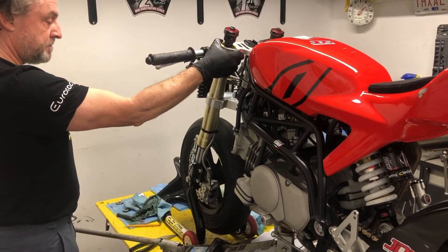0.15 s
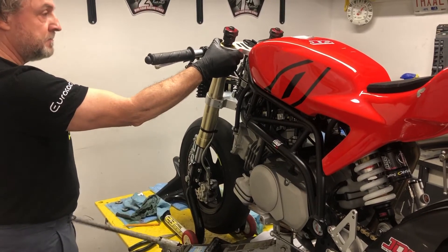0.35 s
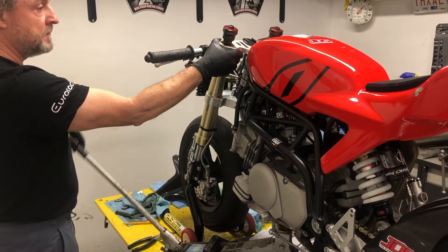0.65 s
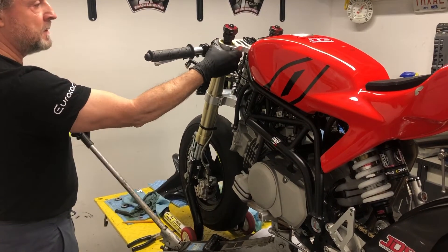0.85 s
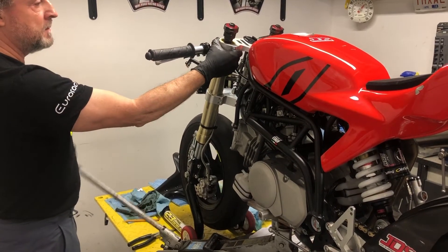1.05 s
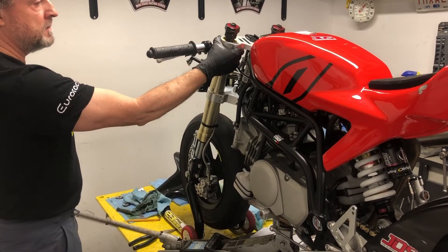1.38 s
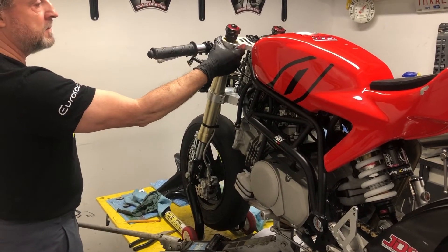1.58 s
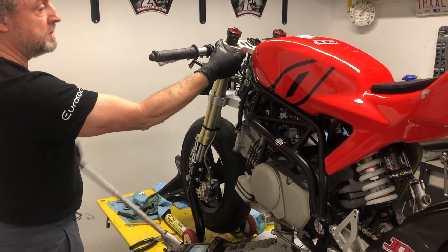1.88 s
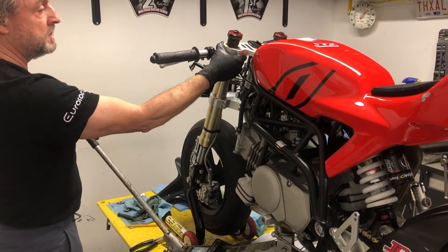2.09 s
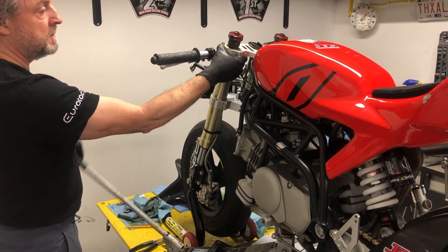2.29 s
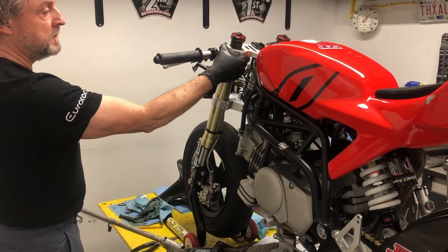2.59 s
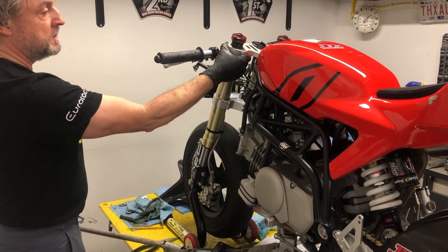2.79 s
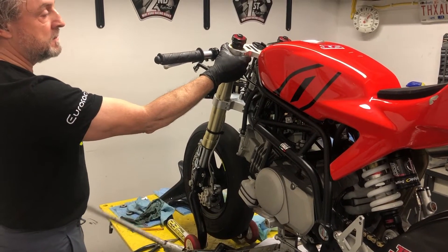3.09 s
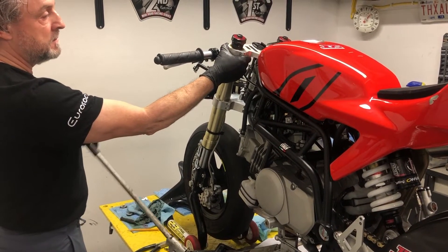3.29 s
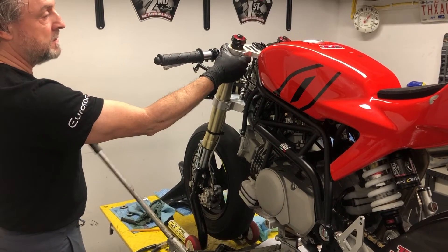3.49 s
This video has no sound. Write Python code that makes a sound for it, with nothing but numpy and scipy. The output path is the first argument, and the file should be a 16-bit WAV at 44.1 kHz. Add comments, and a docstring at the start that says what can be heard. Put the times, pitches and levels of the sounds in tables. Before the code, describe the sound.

Pumping a floor jack: a rattly double knock first, then separate clunks, dull load thuds and brief steel clanks, with faint oil hiss beneath, picked up by one microphone in a small live room.

```python
"""Pumping a trolley jack

A hydraulic trolley jack is pumped under a motorcycle in a small, hard-walled workshop.
The long steel handle knocks in its loose socket and the linkage clunks: coloured clicks with a chatter.
Hard contacts ring as struck modes; pump swishes and the load's shuffle are fine random slips.
A faint noise hiss runs throughout, its thin whistle fading out just before one second."""
import sys
import numpy as np
from scipy import signal
from scipy.fft import rfft, irfft
from scipy.io import wavfile
from scipy.ndimage import uniform_filter1d

SR = 44100
rng = np.random.default_rng(int(sys.argv[2]) if len(sys.argv) > 2 else 0)


def log_audio(samples):
    """Write samples as a 16-bit WAV file to the path given in sys.argv[1]."""
    # one column per channel
    frames = np.atleast_2d(samples).T
    # limit to full scale, then quantise
    limited = np.clip(frames, -1, 1)
    pcm = np.round(limited * 32767).astype(np.int16)
    wavfile.write(sys.argv[1], SR, pcm)


N = 160965


def from_db(db):
    """Decibels to linear gain."""
    return 10 ** (np.asarray(db) / 20)


def rms_one(x):
    """Scales a steady sound to rms 1."""
    return x / np.sqrt(np.mean(x ** 2) + 1e-20)


def unit_energy(x):
    """Scales a short sound to a summed square of 1."""
    return x / np.sqrt(np.sum(x ** 2) + 1e-20)


def in_time(rows):
    """Draws straight lines through (t/s, value) points over the whole scene."""
    return np.interp(np.arange(N) / SR, *np.transpose(rows))


def at_hz(points, hz):
    """Reads (f/Hz, value) points on a logarithmic frequency axis."""
    f, value = np.transpose(points)
    return np.interp(np.log(np.maximum(hz, 1)), np.log(f), value)


def add(out, s, sound):
    """Mixes a sound in at a time in seconds."""
    i = max(int(s * SR), 0)
    out[i:i + len(sound)] += sound[:N - i]


def colour(x, points, size=2048):
    """Causal (minimum-phase) equaliser through (f/Hz, level/dB) points."""
    gain = from_db(at_hz(points, np.fft.rfftfreq(size, 1 / SR)))
    cepstrum = irfft(np.log(gain))
    # folding the cepstrum forward makes the filter minimum-phase
    cepstrum[1:size // 2] *= 2
    cepstrum[size // 2 + 1:] = 0
    impulse = irfft(np.exp(rfft(cepstrum)))
    return signal.fftconvolve(x, impulse)[:len(x)]


def resonance(x, hz, width_hz):
    """Two-pole band-pass with gain 1 on top."""
    r = np.exp(-np.pi * width_hz / SR)
    zeros = np.array([1, 0, -1]) * (1 - r * r) / 2
    poles = [1, -2 * r * np.cos(2 * np.pi * hz / SR), r * r]
    return signal.lfilter(zeros, poles, x + 1e-18)


def grains(per_s, count):
    """Random tiny slips, many small and a few large; rms 1."""
    return rms_one((rng.random(count) < per_s / SR) * rng.laplace(size=count))


EVEN_HZ = 173   # width of the band over which the spectrum is levelled


def even(x):
    """Levels the broad humps and holes of a random burst; unit energy."""
    spectrum = rfft(x, 2 * len(x))
    bins = int(EVEN_HZ * 2 * len(x) / SR) + 1
    power = uniform_filter1d(np.abs(spectrum) ** 2, size=bins)
    return unit_energy(irfft(spectrum / np.sqrt(power + 1e-12))[:len(x)])


# still workshop air, relative spectrum: f/Hz, level/dB
AIR_COLOUR = [(25, -24), (40, -16), (62, 10), (110, 6.5), (600, 3), (1200, -2), (5000, -18.5), (9000, -27),
              (15000, -30)]
AIR_DB = -71.5


def workshop_air():
    """Still air as steady noise, strongest in the low range."""
    return from_db(AIR_DB) * rms_one(colour(rng.standard_normal(N), AIR_COLOUR))


# reverberation time of the room: f/Hz, t60/s
ROOM_T60 = [(150, 0.52), (400, 0.52), (1000, 0.38), (7000, 0.27), (15000, 0.15)]
ROOM_DB, ROOM_GAP_S, ROOM_BUILD_S = -1.5, 0.0017, 0.0073   # tail level, delay and build-up
EARLY_DB, EARLY_S = 1, 0.0047   # early reflections: level and decay time
# a room resonance that swells just after each sound; its band-pass runs twice
BLOOM_S, BLOOM_HZ, BLOOM_WIDTH_HZ, BLOOM_DB = .017, 632, 178, -0.5


def workshop(x):
    """Direct sound, reflections and a tail shorter in the treble; each call draws new paths."""
    t = np.arange(SR // 2) / SR
    spectrum = rfft(rng.standard_normal(len(t)))
    log_hz = np.log(np.fft.rfftfreq(len(t), 1 / SR) + 1)
    centres, t60s = np.transpose(ROOM_T60)
    tail = 0
    # overlapping bands, each with its own decay
    for band, t60 in zip(np.eye(len(centres)), t60s):
        band_noise = irfft(spectrum * np.interp(log_hz, np.log(centres), band), len(t))
        tail = tail + band_noise * np.exp(-np.log(1000) * t / t60)
    arrival = np.clip((t - ROOM_GAP_S) / ROOM_BUILD_S, 0, 1)
    early = rng.standard_normal(len(t)) * np.exp(-t / EARLY_S)
    response = from_db(ROOM_DB) * unit_energy(arrival * tail) + from_db(EARLY_DB) * unit_energy(early)
    response[0] += np.sqrt(.5)   # direct sound
    bloom = np.zeros(len(t))
    bloom[int(BLOOM_S * SR)] = from_db(BLOOM_DB)
    for _ in range(2):
        bloom = resonance(bloom, BLOOM_HZ, BLOOM_WIDTH_HZ)
    return signal.fftconvolve(x, even(response) + bloom)


# faint hiss, probably oil through the valve: t/s, level/dB
SEEP_LEVEL = [(0, -59.5), (.5, -74.5), (.72, -65.5), (.95, -64.5), (1.15, -72), (1.38, -63), (1.95, -72),
              (2.87, -74.5), (3.2, -66)]
# relative spectrum of the hiss: f/Hz, level/dB
SEEP_COLOUR = [(300, 3.5), (1200, 10.5), (2500, 1.5), (5000, -1.5), (10000, -15.5)]
WHISTLE_HZ, WHISTLE_WIDTH_HZ, WHISTLE_DB = 2320, 190, -7   # width of each pass; level re hiss
# start and end of the whistle's fade-out: t/s
WHISTLE_FADE_S = (0.95, 0.99)


def seep():
    """Oil hisses as coloured noise; a narrow noise band whistles in it until it fades."""
    hiss = rms_one(colour(rng.standard_normal(N), SEEP_COLOUR))
    whistle = rng.standard_normal(N)
    for _ in range(2):
        whistle = resonance(whistle, WHISTLE_HZ, WHISTLE_WIDTH_HZ)
    fade = np.interp(np.arange(N) / SR, WHISTLE_FADE_S, [1, 0])
    return from_db(in_time(SEEP_LEVEL)) * (hiss + from_db(WHISTLE_DB) * fade * rms_one(whistle))


# low shuffling of the loaded frame, before the room: t/s, level/dB
SHUFFLE_LEVEL = [(0, -48), (.22, -93), (.39, -51.5), (.49, -59), (.6, -79), (.82, -92), (1.05, -57.5),
                 (1.17, -64.5), (1.44, -61.5), (1.9, -58.5), (2.08, -77.5), (2.3, -51.5), (2.5, -100),
                 (2.76, -81), (2.87, -96), (3.03, -61), (3.65, -61.5)]
# relative spectrum of the shuffling: f/Hz, level/dB
SHUFFLE_COLOUR = [(50, -30), (110, -9), (230, 3.5), (600, 1.5), (1200, -7.5), (2500, -16), (6000, -40),
                  (14000, -67)]
SHUFFLE_GRAINS_PER_S = 700


def shuffle():
    """Small dull ticks as the load shifts on the frame."""
    ticks = rms_one(colour(grains(SHUFFLE_GRAINS_PER_S, N), SHUFFLE_COLOUR))
    return workshop(from_db(in_time(SHUFFLE_LEVEL)) * ticks)[:N]


# resonances of the jack's frame and the room around it: f/Hz, width/Hz, nominal boost/dB
BODY = [(174, 9, 4), (235, 12.5, 8), (349, 28, 5.5), (408, 8.3, 3.5), (516, 16, 7.5), (599.3, 11.5, 9),
        (700, 5.7, 8), (774, 33, 4.5), (993, 90, 7), (1196, 73, 8), (1380, 200, -3), (2350, 120, 2)]
BODY_SPREAD_DB = 3   # each contact excites the resonances a little differently
BASS_CUT_HZ = 224


def body(x):
    """The frame's resonances colour the sound; it radiates little bass."""
    for hz, width_hz, nominal_db in BODY:
        boost_db = nominal_db + BODY_SPREAD_DB * rng.uniform(-1.04, 1)
        x = x + (from_db(boost_db) - 1) * resonance(x, hz, width_hz)
    bass_cut = signal.butter(5, BASS_CUT_HZ, "high", fs=SR, output="sos")
    return signal.sosfilt(bass_cut, x)


# swishes of the sliding pump: start t/s, rise/s, hold/s, relative level/dB at each of SWISH_HZ
SWISHES = [(0.252, 0.0017, 0.029, -35.5, -34.5, -45.5), (0.358, 0.0086, 0.017, -37.5, -66, -79),
           (0.417, 0.011, 0.012, -36, -41.5, -64), (0.84, 0.01, 0.035, -44.5, -73, -84),
           (0.918, 0.01, 0.033, -41, -53, -99), (1.434, 0.0037, 0.008, -40.5, -47.5, -77),
           (1.5, 0.0061, 0.013, -49.5, -46, -59), (1.561, 0.0083, 0.067, -48, -46.5, -61),
           (1.595, 0.011, 0.03, -45, -45, -57), (2.498, 0.0064, 0.041, -51.5, -55.5, -73),
           (2.535, 0.014, 0.022, -36, -45.5, -60.5), (2.585, 0.012, 0.106, -46.5, -53, -70.5),
           (2.681, 0.013, 0.015, -37.5, -44.5, -59), (2.741, 0.0041, 0.034, -41.5, -60, -74),
           (2.903, 0.018, 0.032, -37.5, -48, -64.5), (3.069, 0.013, 0.029, -41, -43, -59)]
# equaliser points of the swishes: f/Hz
SWISH_HZ = [900, 4300, 12000]
SWISH_RELEASE_S, SWISH_GRAINS_PER_S, SWISH_DB = 0.0035, 2500, -3


def swishes():
    """Dense fine friction that swells, holds and stops."""
    out, t = np.zeros(N), np.arange(SR // 4) / SR
    for s, rise, hold, *levels_db in SWISHES:
        release = np.exp(-np.maximum(t - rise - hold, 0) / SWISH_RELEASE_S)
        envelope = np.minimum(t / rise, 1) * release
        slips = envelope * grains(SWISH_GRAINS_PER_S, len(t))
        friction = colour(slips, list(zip(SWISH_HZ, levels_db)))
        add(out, s, workshop(body(friction)))
    return from_db(SWISH_DB) * out


MODE_SPLIT_HZ = 29   # typical split of each mode's beating pair; the actual split varies


def ring(modes):
    """A struck part: beating pairs of dying partials; unit energy."""
    t, out = np.arange(SR // 3) / SR, 0
    for hz, db, t60 in modes:
        decay = from_db(db) * np.exp(-np.log(1000) * t / t60)
        for pitch in hz + MODE_SPLIT_HZ * np.array([-.5, .5]) * (1 + .5 * rng.normal()):
            out = out + decay * np.cos(2 * np.pi * pitch * t)
    return unit_energy(out)


# modes of the loaded frame: f/Hz, relative level/dB, t60/s
FRAME = [(190, -9.5, 0.18), (232.6, 7.5, 0.23), (765, 0.5, 0.15), (2487, -5, 0.055)]
# the load settles on the frame during a down-stroke: t/s, level/dB before the room
THUDS = [(1.0867, -16.5), (2.349, -18.5)]


def thuds():
    """The loaded frame rings low as the load settles."""
    out = np.zeros(N)
    for s, db in THUDS:
        add(out, s, workshop(from_db(db) * ring(FRAME)))
    return out


# modes of the pump lever, struck at the bottom of a stroke: f/Hz, relative level/dB, t60/s
LEVER = [(2220, 7.5, .06), (3300, -4, 0.079), (3587, 3.5, .08), (5130, -1, 0.18), (6980, -4.5, 0.14),
         (10950, -21, 0.14)]
# modes of the handle socket, struck near the top of a stroke: f/Hz, relative level/dB, t60/s
SOCKET = [(4400, 5, 0.06), (4550, -9, 0.13), (5010, 2, .17), (5200, -9, 0.24), (7046, -19, 0.2),
          (7221, -22, 0.13)]
# hard contacts, before the room: t/s, pump lever level/dB, handle socket level/dB
CLANKS = [(0.9857, -32, -36), (1.667, -16.5, -45), (2.1199, -45, -21.5), (3.513, -47, -30),
          (3.556, -26, -45)]


def clanks():
    """Steel lever and socket ring on after the hard contacts."""
    out = np.zeros(N)
    for s, lever_db, socket_db in CLANKS:
        steel = from_db(lever_db) * ring(LEVER) + from_db(socket_db) * ring(SOCKET)
        add(out, s, workshop(steel))
    return out


# knocks of handle and linkage: t/s, chatter decay/s, relative level/dB at each of KNOCK_HZ
KNOCKS = [(0.0098, 0.01, 6, 12, 11.5, 3, 2.5, -17), (0.039, .007, 4, 8, 1, -3, -0.5, -37),
          (0.2572, 0.025, -3.5, 1, 3, -5.5, -4, -15), (0.3309, 0.0018, -4, -6.5, -2.5, -3.5, -11.5, -38),
          (0.345, 0.0045, -17, -1, -16, -15, -11, -34), (0.407, 0.0046, -13, -19, -10, -8.5, -14.5, -32.5),
          (0.4301, 0.0057, -8, -5, -7, -5, -16, -22), (0.9847, 0.0038, 4.5, 4, -5.5, -1, -19.5, -33.5),
          (1.0865, 0.0023, -2.5, 1, -1.5, -10, -57, -65), (1.2061, 0.0011, -7.5, 0.5, -4, -2, -16, -40.5),
          (1.533, 0.002, -19, -8.5, -11.5, -14, -30, -48), (1.619, 0.0039, -2, 1.5, -3.5, -17, -43, -45),
          (1.665, 0.0032, -1.5, -2, -2, -2.5, -11.5, -32), (1.772, 0.0079, -6.5, -11, -10, -6.5, -7.5, -36),
          (1.787, 0.0045, -11, -2.5, -3.5, -7.5, -18, -31.5),
          (2.037, 0.0055, -4.5, -17.5, -16.5, -54, -63, -55), (2.1195, 0.0055, 0, 4, -3, -8.5, -10, -33),
          (2.196, 0.0074, -4, 0, -40, -29, -37, -46), (2.233, .0073, -13, -19, -13.5, -10.5, -18, -35.5),
          (2.267, 0.0056, -21, -4.5, -27, -42, -26, -67), (2.349, 0.0025, -0.5, 1, -2, -7.5, -54, -60),
          (2.697, 0.0069, -28, -10, -1.5, -20, -36, -30), (2.9105, 0.0049, -1, 1.5, -8, -15, -18.5, -36),
          (2.973, 0.0027, -10, -5, -8, -19, -26, -41), (3.017, 0.0031, -27, -26, -7.5, -10.5, -12.5, -30),
          (3.096, 0.0041, -14, -8, -6, -12, -23, -41), (3.312, 0.0072, -7, -7, -13, -26.5, -46, -60),
          (3.4147, 0.0043, -16, -3.5, -12, -17.5, -22, -51),
          (3.444, 0.0059, -13.5, 0, -6.5, -18.5, -32, -62), (3.513, 0.0062, -12.5, -6, -11, -16, -13, -49),
          (3.5545, 0.0022, -11, -18, -14, -17, -23, -22), (3.559, 0.0056, -6.5, 0, -6, -6.5, -12.5, -57)]
# equaliser points of the knocks: f/Hz
KNOCK_HZ = [270, 780, 1650, 2750, 4600, 10500]
RATTLE_GRAINS_PER_S, RATTLE_DB, KNOCK_DB = 1500, 3, -3.5   # the joint chatters after each contact
LOOSE_S = 0.011   # the longer the chatter, the weaker the leading click


def knocks():
    """Each contact is a click with a short chatter, in its own colour."""
    out, t = np.zeros(N), np.arange(SR // 4) / SR
    for s, chatter_s, *levels_db in KNOCKS:
        chatter = grains(RATTLE_GRAINS_PER_S, len(t)) * np.exp(-t / chatter_s)
        contact = from_db(RATTLE_DB) * unit_energy(chatter)
        contact[0] += np.exp(-chatter_s / LOOSE_S)   # leading click
        knock = colour(even(contact), list(zip(KNOCK_HZ, levels_db)))
        add(out, s, workshop(body(knock)))
    return from_db(KNOCK_DB) * out


def scene():
    """The jack and its load over the still air of the room."""
    background = workshop_air() + seep() + shuffle()
    jack = swishes() + thuds() + clanks() + knocks()
    return (background + jack)[None]


CUTOFF_HZ = 15850


def record(dry):
    """A steep low-pass cuts the top."""
    return signal.sosfilt(signal.ellip(12, .1, 70, CUTOFF_HZ, fs=SR, output="sos"), dry)


dry = scene()
out = record(dry)
log_audio(out)
```